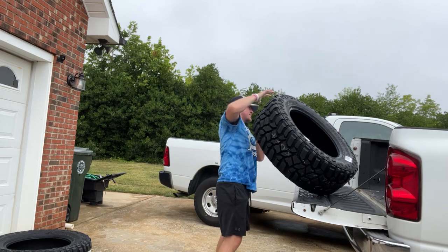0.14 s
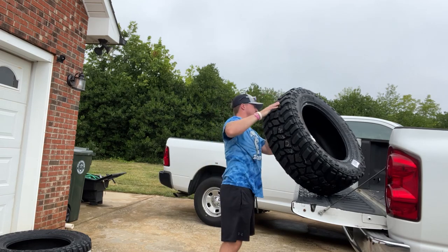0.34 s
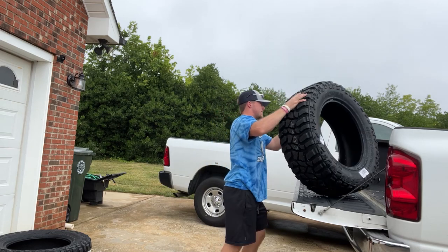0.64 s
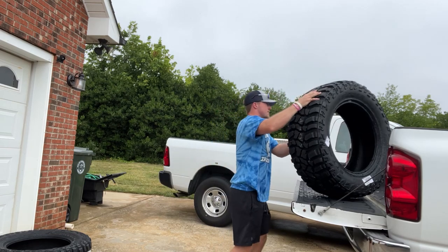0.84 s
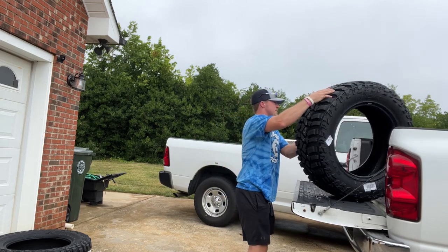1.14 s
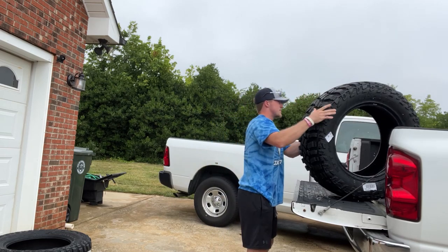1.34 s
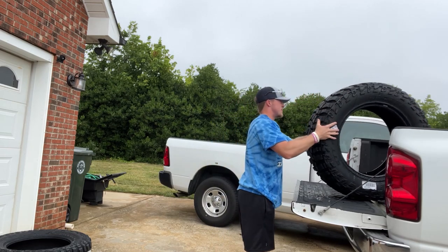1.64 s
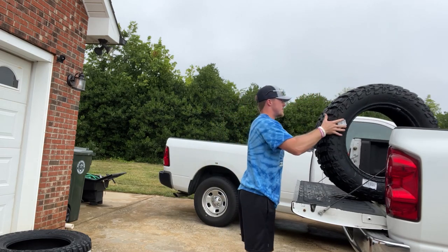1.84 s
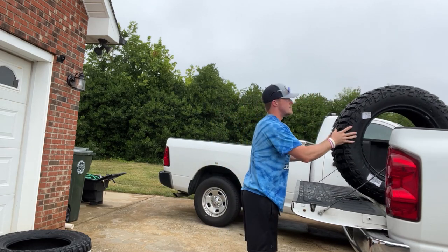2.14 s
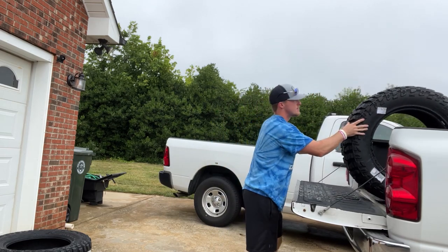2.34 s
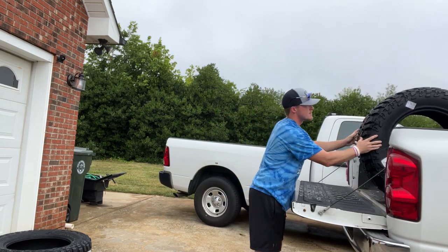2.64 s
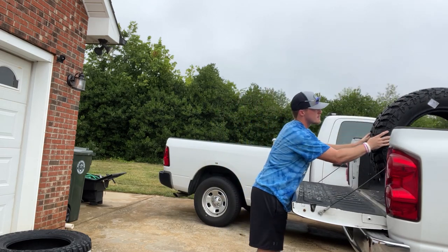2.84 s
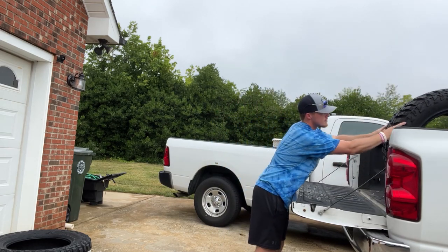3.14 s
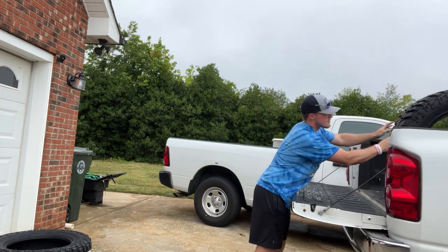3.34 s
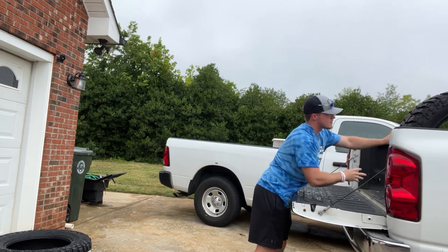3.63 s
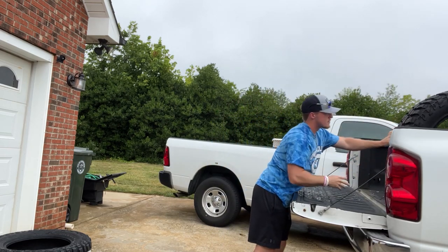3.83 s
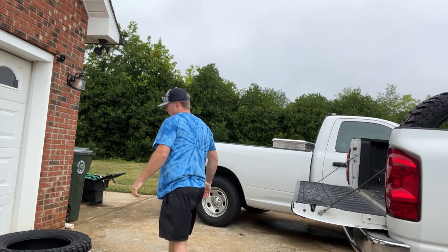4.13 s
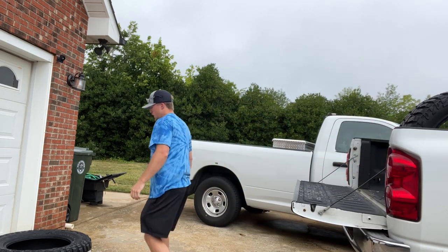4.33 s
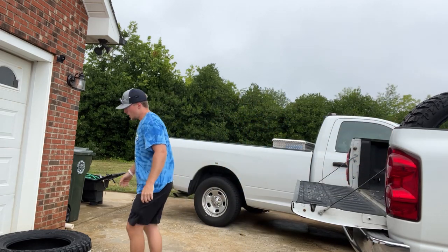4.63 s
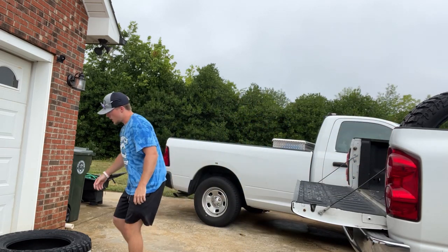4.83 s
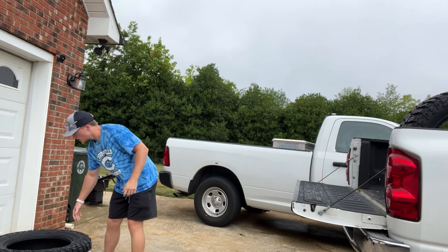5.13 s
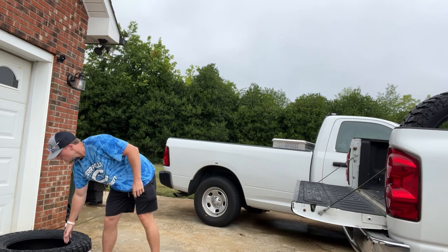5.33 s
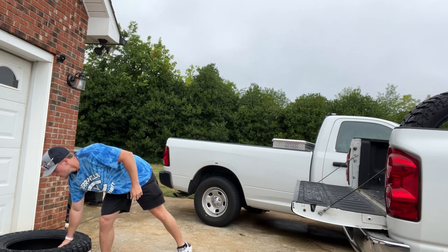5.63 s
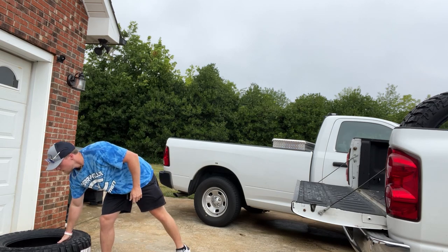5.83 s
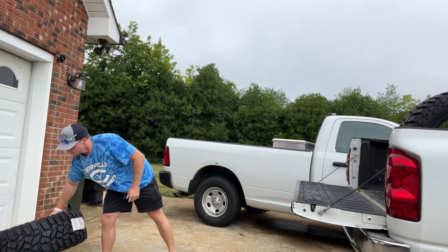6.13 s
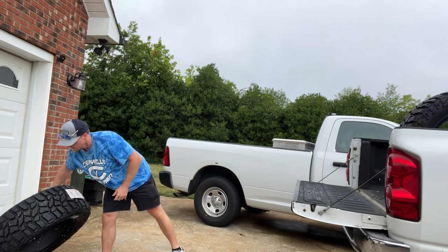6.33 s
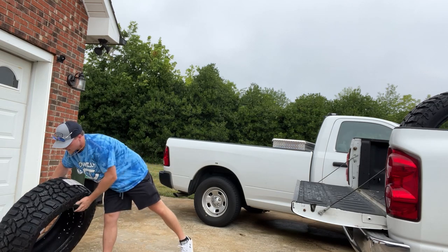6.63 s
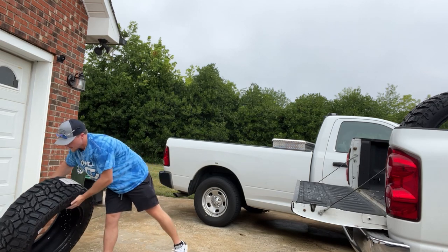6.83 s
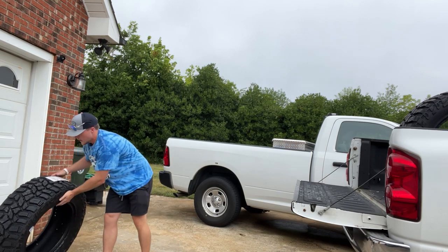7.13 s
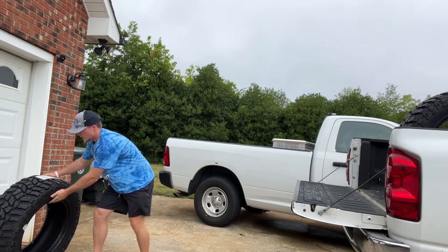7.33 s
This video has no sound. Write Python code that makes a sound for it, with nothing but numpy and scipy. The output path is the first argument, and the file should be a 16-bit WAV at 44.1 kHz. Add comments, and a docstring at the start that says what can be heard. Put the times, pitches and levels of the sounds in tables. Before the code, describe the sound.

At 0 s a heavy tyre lands on a pickup tailgate: deep, dull thumps drop quickly in pitch, with another at 0.25 s, over briefly strong low rumble. Soft rubber scuffs and dry pops continue to about 1.5 s, with faint thumps near 1 and 2.1 s. Songbirds whistle throughout with short outdoor echoes; a quickening, fading run of falling chirps spans 1.5-2.6 s, with a faint insect-like buzz around 2.4-3 s. At 3.4-3.7 s the tyre scrapes and knocks the bed, its steel ringing briefly; a soft thump follows at 3.95. A nearby bird gives a buzzy trill at 4.35-4.8 s. Light scuffs and pops occur from 4.1 to 5.3, then mostly birds. From 6.0 s the second tyre drags on concrete, popping rapidly at 6.2, with the hardest gritty, hissy rubs and hollow knocks at 6.45-6.6. Smaller scuffs follow at 7.1 and 7.3. Close stereo, little reverberation.

```python
"""A heavy tyre has just dropped on a pickup's tailgate: pitch-dropping thumps over low outdoor rumble noise.
Songbirds, as trembling glides with echoes, whistle throughout, one trilling nearby, with a run of chirps from
the hedge and a thin insect-like buzz. Scuffs (grains of slip through resonances) and pops (damped cycles) recur
as the tyre is rolled into the bed, whose steel modes ring. A second tyre is then dragged up off a concrete
drive, with the hardest rubs and knocks. Two microphones a few centimetres apart hear it by delay and level."""
import sys
import numpy as np
from scipy import signal
from scipy.fft import rfft, irfft, next_fast_len
from scipy.io import wavfile
from scipy.ndimage import uniform_filter1d, map_coordinates

SR = 44100
rng = np.random.default_rng(int(sys.argv[2]) if len(sys.argv) > 2 else 0)


def unload_audio(sound):
    """Save the sound as a 16-bit wav file, at the path given as the first command line argument."""
    columns = np.transpose(np.atleast_2d(sound))
    # keep every value between -1 and 1, then stretch to whole-number steps
    steps = np.round(np.clip(columns, -1, 1) * 32767)
    wavfile.write(sys.argv[1], SR, steps.astype(np.int16))


N = 329427  # length [samples]


def gain_of(db):
    """Amplitude ratio of a level in decibels."""
    return 10 ** (np.asarray(db) / 20)


def evened(x):
    """Normalisation to unit root-mean-square amplitude."""
    return x / np.sqrt(np.mean(x ** 2) + 1e-20)


def read(points, hz):
    """Interpolates a spectrum table linearly on a log-frequency axis."""
    f, value = np.transpose(points)
    return np.interp(np.log(hz + 1), np.log(f + 1), value)


def add(mix, s, sound):
    """Linear superposition of a sound onto the mix from time s, cut at the end."""
    part = mix[..., round(s * SR):][..., :sound.shape[-1]]
    part += sound[..., :part.shape[-1]]


def coloured(x, points):
    """Spectral shaping: weights x by a table, silent below it and just above it, at unit rms."""
    size = next_fast_len(N)
    hz = np.fft.rfftfreq(size, 1 / SR)
    inside = (hz > points[0][0]) & (hz < points[-1][0] * 1.05)
    spectrum = rfft(x, size) * gain_of(read(points, hz)) * inside
    return evened(irfft(spectrum, size)[..., :N])


def ringing(x, modes, factor=1):
    """Modal resonance: shifts each mode (moved by a factor) down to zero, smooths, shifts back."""
    out = 0
    for hz, width, db in modes:
        turn = np.exp(2j * np.pi * np.cumsum(hz * factor * np.ones(x.shape[-1])) / SR)
        r = np.exp(-np.pi * width / SR)
        smooth = signal.lfilter([1], [1, -r], x / turn)
        out = out + gain_of(db) * np.sqrt(2 * (1 - r ** 2)) * (turn * smooth).real
    return out / np.linalg.norm(gain_of([mode[2] for mode in modes]))


def spread(x, t60, start):
    """Diffuse reflection: convolution with decaying noise, independent in each ear."""
    t = np.arange(int(.4 * SR)) / SR
    tail = rng.standard_normal((2, len(t))) * gain_of(-60 * t / t60) * (t > start)
    return signal.fftconvolve(x[None], tail / np.linalg.norm(tail[0]), axes=1)[:, :N]


def placed(x, pan_db, reach=1.35):
    """Interaural delay follows the work; lower sounds get a longer delay between the ears (larger reach)."""
    # Where the work is: (time [s], lateness of the left ear before the reach factor [microseconds])
    lag = [(0, 40), (3.4, 132), (4.2, -20), (5.0, -80.5), (5.9, -100), (6.9, -100), (7.1, -20), (7.4, -107)]
    late = reach * np.interp(np.arange(N) / SR, *np.transpose(lag)) * 1e-6 * SR  # samples
    ears = [map_coordinates(x, [np.arange(N) - side * late / 2], order=3, mode="nearest")
            for side in (1, -1)]
    return np.array(ears) * gain_of([[pan_db / 2], [-pan_db / 2]])


def grains(per_s, spread_db):
    """Random impulse process: tiny slips of random sign and size; one shared stream, then one per ear."""
    size = gain_of(spread_db * np.minimum(rng.exponential(1, (3, N)), 4))
    return evened(size * rng.standard_normal((3, N)) * (rng.random((3, N)) < per_s / SR))


def background():
    """Partly coherent noise: low drumming of bed and far traffic, with thin outdoor air in drifting patches."""
    # Low drumming: (time [s], deep part [dB], upper part [dB])
    rumble = [(0.0, -40.5, -41.5), (0.21, -52, -54), (1.79, -56.5, -56.5), (2.1, -54.5, -46),
              (2.58, -56.5, -60.5), (3.7, -50.5, -52.5), (4.28, -54.5, -56), (6.41, -52, -53),
              (6.471, -48, -56), (6.66, -51.5, -52), (7.47, -54, -58.5)]
    # Spectra of the deep part, upper part and air: (frequency [Hz], relative density [dB per Hz])
    deep_spectrum = [(25, -43), (40, -19.5), (55, 1.5), (70, -4.5), (88, -1), (110, -19.5), (150, -24.5)]
    upper_spectrum = [(80, -15), (115, 0), (170, 0), (250, -8.5), (400, -12), (470, -33.5), (700, -49)]
    air_spectrum = [(240, -0.5), (400, -5), (536, 0), (789, -0.5), (1380, -7), (1730, -12), (2750, -9),
                    (3020, -11.5), (4050, -12.5), (6640, -27.5), (10700, -26.5), (13700, -35), (16000, -34)]
    air_db = -67.5
    # Left-right likeness: (frequency [Hz], correlation [-1 to 1])
    likeness = [(60, 0.97), (130, 0.92), (290, 0.69), (640, -0.25), (1410, 0.48), (3100, -0.61),
                (6820, 0.29), (15000, 0.083)]

    frames, hz = N // 256 + 5, np.fft.rfftfreq(1024, 1 / SR)
    a, b, c, d, patches = rng.standard_normal((frames, 513, 5)).T
    patches = uniform_filter1d(patches, size=10, axis=0)  # over frequency
    patches = evened(uniform_filter1d(patches, size=14, axis=1))  # over time
    same = np.clip(read(likeness, hz), -1, 1)[:, None]
    left = a + 1j * b
    right = same * left + np.sqrt(1 - same ** 2) * (c + 1j * d)
    patch_gain = gain_of(2.4 * patches * (hz > 500)[:, None])
    noise = signal.istft(np.array([left, right]) * patch_gain, nperseg=1024, noverlap=768)[1][:, :N]

    s, deep_db, upper_db = np.transpose(rumble)
    t = np.arange(N) / SR
    deep = gain_of(np.interp(t, s, deep_db)) * coloured(noise, deep_spectrum)
    upper = gain_of(np.interp(t, s, upper_db)) * coloured(noise, upper_spectrum)
    return deep + upper + gain_of(air_db) * coloured(noise, air_spectrum)


def whistle(length, hz0, hz1, db, tremble_hz, throb_db=3.5):
    """Frequency and amplitude modulation: a gliding near-sine whose pitch and strength tremble."""
    t = np.arange(int(length * SR)) / SR
    pitch, strength = (evened(uniform_filter1d(z, size=130)) for z in rng.standard_normal((2, len(t))))
    hz = np.linspace(hz0, hz1, len(t)) + tremble_hz * np.clip(pitch, -2, 2)
    tone = np.sin(2 * np.pi * np.cumsum(hz) / SR) * gain_of(db + throb_db * strength)
    return np.sqrt(2) * tone * signal.windows.tukey(len(t), .6)


def birds():
    """Direct and reverberant fields: birds and an insect-like buzz, part direct, part echo off trees and walls."""
    # Sounds that come back, as lists of notes by name; "thin buzz" is a thin insect-like buzz at 6 kHz:
    # (delay [s], length [s], start [Hz], end [Hz], level against the whole [dB], tremble [Hz])
    shapes = {"triplet": [(0, 0.042, 4790, 4910, -6.5, 94), (.028, .06, 3050, 3265, -1, 49.4),
              (.058, .057, 3320, 3940, -6.5, 193.6)], "thin buzz": [(0.0014, 0.24, 6000, 5990, 0, 169.4)],
              "held": [(0, .07, 4090, 3920, 1, 20)], "long held": [(-0.0045, .16, 3824, 3804, -4, 12)],
              "long fall": [(0, .095, 6000, 4700, -11, 90), (.13, .11, 4170, 3180, 2, 20)],
              "flick": [(0, .05, 1780, 2377, -1.5, 19), (.044, 0.025, 2920, 2760, -7.5, 18)]}
    # When they are heard: (time [s], name of sound, level [dB])
    heard = [(.05, "long held", -81), (0.261, "long held", -76.5), (0.52, "long held", -77),
             (.49, "long fall", -88), (.94, "held", -74.5), (.83, "long fall", -74.5),
             (1.109, "held", -74.5), (1.2, "long fall", -74), (1.228, "held", -72), (1.245, "flick", -75),
             (1.545, "flick", -77), (1.685, "flick", -74), (2.135, "flick", -74), (1.95, "triplet", -69.5),
             (1.982, "flick", -78), (2.388, "triplet", -67.5), (2.39, "thin buzz", -90),
             (2.782, "thin buzz", -87), (2.836, "triplet", -67.5), (3.39, "held", -80),
             (5.295, "long fall", -77.5), (5.632, "long fall", -74), (5.765, "triplet", -67.5),
             (6.335, "long fall", -70), (6.4, "flick", -77), (6.661, "triplet", -66), (6.73, "flick", -77),
             (6.892, "flick", -71), (7.035, "flick", -77), (7.193, "flick", -71), (7.352, "flick", -73)]
    # Single notes of several birds: (time [s], length [s], start [Hz], end [Hz], level [dB])
    notes = [(0.033, 0.035, 2930, 3400, -79), (0.633, 0.05, 4000, 3600, -83),
             (0.662, 0.052, 3580, 3460, -78), (0.799, 0.1, 3920, 3900, -78),
             (0.846, 0.065, 2500, 2180, -74.5), (1.17, 0.067, 2250, 2000, -74.5),
             (1.438, 0.066, 2510, 2810, -74), (1.653, 0.031, 2850, 2770, -76),
             (1.726, 0.12, 2010, 2266, -73), (1.791, 0.068, 2235, 2064, -76),
             (1.795, 0.03, 2490, 2860, -73), (1.813, 0.04, 2800, 2800, -71), (1.86, 0.081, 2780, 2410, -82),
             (2.03, 0.098, 2075, 2140, -74.5), (2.08, 0.059, 2810, 2860, -71.5),
             (2.158, 0.1, 2020, 2210, -74.5), (2.232, 0.063, 2956, 2680, -67),
             (2.266, 0.18, 2610, 2600, -75), (2.487, 0.096, 2170, 1980, -74),
             (2.544, 0.028, 2840, 2800, -72.5), (2.611, 0.062, 2104, 2034, -77),
             (2.661, 0.056, 2070, 2590, -77), (2.691, 0.084, 2630, 2734, -72),
             (2.745, 0.087, 2710, 2486, -76.5), (2.985, .05, 2750, 2600, -74.5),
             (3.007, 0.055, 2067, 2090, -72), (3.228, 0.058, 2960, 2660, -74.5),
             (3.871, 0.052, 4600, 3520, -80.5), (3.982, 0.079, 2090, 2050, -76),
             (4.062, 0.088, 2080, 2385, -69), (4.063, 0.08, 2760, 2680, -86),
             (4.134, 0.21, 2416, 2534, -65), (4.873, 0.02, 3850, 3800, -76),
             (4.802, 0.024, 4600, 4530, -65), (5.351, 0.058, 3150, 3530, -74.5),
             (5.386, 0.064, 3520, 3520, -75.5), (5.46, 0.044, 2860, 2920, -73.5),
             (5.534, 0.052, 2067, 2094, -75.5), (5.599, 0.046, 2510, 2880, -72.5),
             (5.635, 0.036, 2816, 2740, -73), (5.657, 0.061, 2696, 2600, -71.5),
             (5.908, 0.04, 2900, 2250, -73), (5.945, 0.038, 2710, 2840, -75.5),
             (5.974, 0.067, 2005, 2150, -75.5), (6.041, 0.044, 2200, 2840, -74),
             (6.078, 0.04, 2860, 2950, -71), (6.643, 0.075, 2170, 2290, -73)]
    # Higher first buzz of the trill: (time [s], length [s], start [Hz], end [Hz], level [dB])
    opening = [(4.352, 0.088, 4920, 4760, -60.5)]
    clear_hz, burry_hz, buzz_tremble_hz = 22, 85, 150
    break_hz, burry_until_s = 2500, 3.9  # single notes just above the break are burry, for a while
    run_s, run_gap_s, run_quicken_s = 1.468, .0845, .0018
    run_db, run_fade_db = -72.5, -0.58  # fade per chirp
    trill_s, trill_gap_s, buzz_s, buzz_mid_hz = 4.464, .0855, 0.058, 4640
    buzz_db, buzz_fade_db, flick_db = -62.5, -0.8, -69  # fade per buzz

    # the flicks come over open ground, the run from deep in the hedge
    far, near, open_air, hedge = np.zeros((4, N))
    for s, name, db in heard:
        field = open_air if name == "flick" else far
        for delay, length, hz0, hz1, note_db, tremble_hz in shapes[name]:
            throb_db = min(4, tremble_hz / 8)  # the steadier the pitch, the steadier the strength
            add(field, s + delay, whistle(length, hz0, hz1, db + note_db, tremble_hz, throb_db))
    for s, length, hz0, hz1, db in notes:
        burry = break_hz < hz0 < 3500 and s < burry_until_s
        add(far, s, whistle(length, hz0, hz1, db, burry_hz if burry else clear_hz))

    # a run of like falling chirps that quickens and fades
    for k in range(16):
        s = run_s + k * run_gap_s - k * (k - 1) / 2 * run_quicken_s
        add(hedge, s, whistle(.055, 4300, 3800, run_db + k * run_fade_db, 30))

    chorus = np.zeros(N)  # birds so far off that only their echo arrives
    for when, pitch, glide, size in rng.random((70, 4)):
        hz = 1900 + 1700 * pitch
        call = whistle(0.028 + 0.066 * size, hz, hz * (.86 + .28 * glide), -82, clear_hz)
        add(chorus, when * N / SR, call)

    # a buzzy trill nearby: the first buzz, then two flicks and a buzz in even time
    for s, *note in opening:
        add(near, s, whistle(*note, buzz_tremble_hz, throb_db=0.0))
    for k in range(4):
        s = trill_s + k * trill_gap_s
        add(near, s - .022, whistle(0.014, 3600, 4500, flick_db - 4, 60))
        add(near, s - .009, whistle(0.016, 3300, 4550, flick_db, 60))
        buzz = whistle(buzz_s, buzz_mid_hz + 60, buzz_mid_hz - 60, buzz_db + k * buzz_fade_db,
                       buzz_tremble_hz, throb_db=-1.0)
        add(near, s, buzz)

    direct = (far + open_air + hedge) * gain_of([[.7], [-.7]]) + near * gain_of([[-.5], [.5]])
    echoing = far + gain_of(-4) * open_air + gain_of(0.5) * hedge + chorus
    far_echo = gain_of(1.5) * spread(echoing, 0.37, .004)
    return direct + far_echo + gain_of(1.5) * spread(near, 0.3, 0.0033)


def thumps():
    """Damped oscillation with falling frequency: dull blows whose pitch drops as the rubber settles."""
    # Blows on tailgate, bed and ground: (time [s], level before rise and decay [dB], settled pitch [Hz])
    blows = [(.003, -34, 61.2), (.02, -31, 54), (0.257, -36.5, 56), (0.983, -45, 126), (2.03, -42.5, 145),
             (2.101, -40, 142), (3.564, -38.5, 193), (3.577, -46.5, 129), (3.595, -37.5, 82),
             (3.951, -41, 89.8), (6.297, -44, 205), (6.531, -55, 218)]
    drop, cycles = 2.234, 20  # first pitch over settled pitch; settled cycles to die by 60 dB
    out, t = np.zeros(N), np.arange(SR // 4) / SR
    for s, db, hz1 in blows:
        hz0, t60 = drop * hz1, cycles / hz1
        hz = hz1 + (hz0 - hz1) * np.exp(-t / 0.0148)
        envelope = gain_of(db - 60 * t / t60) * np.minimum(t / 0.0023, 1)
        add(out, s, np.sin(2 * np.pi * np.cumsum(hz) / SR) * envelope)
    return placed(out, 0.5) + gain_of(-27.0) * spread(out, 0.17, 0.0015)


def bed():
    """Friction-driven modal vibration: uneven slips ring the steel, brighter or duller with the contact."""
    # Modes of the steel bed: (frequency [Hz], width [Hz], relative level [dB])
    steel = [(575, 60, 1.5), (752, 19, -1.5), (980, 56, -6), (1352, 31, 0), (1490, 24, -3), (1724, 64, -8),
             (2166, 80, -2.5), (2600, 110, -5.5), (3020, 250, -6.5), (3600, 110, -7), (4170, 78, -12)]
    # The tyre dragged against the bed: (time [s], length [s], level [dB], tilt [dB per octave])
    scrapes = [(3.443, 0.059, -59, 0.5), (3.52, 0.072, -67, 0.5), (3.643, 0.024, -57, 8.5)]
    rise_s, t60_s = 0.012, 0.061
    out, t = np.zeros(N), np.arange(SR // 4) / SR
    soft_contact = [(400, -3), (1000, 0), (4000, 0), (7000, -30)]  # rubber: (frequency [Hz], [dB per Hz])
    slips = coloured(grains(per_s=2500, spread_db=1.5)[0], soft_contact)
    for s, length, db, tilt_db in scrapes:
        drive = np.minimum(t / rise_s, 1) * gain_of(db - 60 * np.maximum(t - length, 0) / t60_s)
        drive = drive * slips[round(s * SR):][:len(t)]
        tilted = [(hz, width, mode_db + tilt_db * np.log2(hz / 1000)) for hz, width, mode_db in steel]
        add(out, s, ringing(drive, tilted))
    return placed(out, -1.7) + gain_of(1.5) * spread(out, 0.14, 0.0084)


def pops():
    """Impulsive release: damped cycles that sag in pitch, a bright tick on the front, then scattering."""
    # Lugs and grit letting go: (time [s], ring level before damping [dB], ring [Hz], tick level [dB])
    releases = [(0.082, -70, 2000, -55), (0.197, -50, 1900, -63), (0.203, -41, 1400, -70),
                (0.265, -65, 2000, -54), (.533, -63, 2010, -58), (0.743, -42.5, 835, -45),
                (0.764, -43, 1310, -47), (0.992, -31.5, 1100, -62), (1.003, -40, 980, -56),
                (1.001, -46, 3800, -70), (1.012, -42, 1130, -71), (2.247, -60, 2260, -64),
                (4.075, -70, 2180, -68), (4.147, -43, 2380, -54), (4.154, -45, 2410, -65),
                (4.22, -44, 1250, -46), (4.249, -50, 2400, -60), (4.268, -38.5, 1580, -46),
                (4.282, -54, 2490, -46), (4.649, -41.5, 1200, -58), (4.777, -39.5, 696, -43),
                (4.78, -49, 2350, -58), (5.045, -37.5, 2270, -61), (5.071, -33.5, 2230, -60),
                (5.108, -31.5, 1400, -49), (5.112, -34, 1160, -47), (5.195, -42, 1170, -57),
                (5.295, -48.5, 1450, -64), (5.874, -65, 2000, -59), (6.046, -55, 1270, -45),
                (6.074, -60, 2000, -55), (6.105, -51, 2000, -45), (6.125, -63, 2000, -52),
                (6.168, -21.5, 1070, -47), (6.182, -27.5, 1150, -57), (6.212, -27.5, 1160, -55),
                (6.228, -26.5, 1130, -62), (6.237, -35, 900, -55), (6.25, -29.5, 955, -65),
                (6.281, -42, 1020, -54), (6.302, -35.5, 890, -44), (6.461, -33.5, 1150, -48),
                (6.479, -24, 990, -33), (6.535, -33, 915, -48), (6.554, -35, 1300, -38),
                (6.563, -31.5, 1010, -50), (6.6, -52, 1050, -55), (7.09, -37, 1020, -50),
                (7.099, -37, 1390, -62), (7.111, -36, 1100, -60), (7.304, -40.5, 950, -49.5)]
    # Short overtones on each pop: (pitch over ring [ratio], level over ring [dB],
    # decay by 60 dB [cycles of the ring])
    cracks = [(2.184, -11, 12), (3.5, -18.5, 9.6)]
    out, t = np.zeros(N), np.arange(700) / SR
    ticks = rng.standard_normal((len(releases), 700)) * gain_of(-60 * t / .006)
    for (s, db, hz, tick_db), tick in zip(releases, ticks):
        turns = hz * (t + 0.00018 * (1 - np.exp(-t / 0.00039)))  # phase [cycles], fast at first
        ring = np.sin(2 * np.pi * turns) * gain_of(db - 60 * t * hz / 9.2)
        ring = ring * np.minimum(t * hz / 0.32, 1)
        crack = sum(np.sin(2 * np.pi * ratio * turns) * gain_of(db + over_db - 60 * t * hz / cycles)
                    for ratio, over_db, cycles in cracks)
        bright = np.convolve(tick, [.3, .6, 0, -.6, -.3], "same")
        add(out, s, ring + crack + gain_of(tick_db) * bright)
    return placed(out, -1.5) + gain_of(-6) * spread(out, .09, .003)  # scatter off wall and truck


def scuffs():
    """Stick-slip excitation: each rub drives hollow, rubber, grit and hiss; the treble fades first."""
    # Rubbing of tread, hands and soles: (time [s], length [s], tyre level [dB], grit level [dB],
    # hiss level [dB], pitch factor on the rubber [ratio])
    rubs = [(0.0, 0.056, -59.5, -66.5, -73, 0.5), (0.181, 0.027, -53.5, -67, -72, 1.21),
            (0.232, 0.14, -77, -94, -63.5, 0.66), (0.305, 0.083, -63, -76, -53.5, 0.58),
            (0.521, 0.028, -64.5, -63, -67, 0.94), (0.66, 0.032, -87, -85, -69, 0.9),
            (0.735, 0.036, -55.5, -55.5, -54, 0.94), (0.891, 0.074, -75, -71, -72.5, 1.6),
            (0.986, 0.03, -57, -59, -87, 1.2), (1.027, 0.16, -62, -93, -102, 0.5),
            (1.154, 0.022, -58, -54, -64, 1.08), (1.344, 0.05, -63.5, -52.5, -65.5, 0.7),
            (1.494, 0.06, -66, -64.5, -74.5, 1.33), (1.846, 0.023, -94, -61.5, -73, 0.84),
            (2.502, 0.066, -66, -75, -74, 0.82), (3.448, 0.041, -54, -55, -63.5, 1.1),
            (3.558, 0.029, -53, -58, -76, 0.6), (3.635, 0.03, -49, -46.5, -61.5, 0.873),
            (3.73, 0.093, -62.5, -70.5, -98, 0.47), (4.14, 0.012, -64, -65, -78, 1.2),
            (4.211, 0.067, -59, -65, -66, 1.18), (4.308, 0.04, -59.5, -65, -71, 1.05),
            (4.371, 0.016, -70, -59, -77, 1.3), (4.638, 0.042, -57, -69, -63, 0.96),
            (4.764, 0.028, -48.5, -53.5, -50, 1.38), (5.019, 0.05, -53, -62.5, -69.5, 2.2),
            (5.08, 0.053, -62, -58.5, -74, 1.25), (5.182, 0.019, -58, -61.5, -77, 0.83),
            (5.773, 0.041, -98, -81, -78.5, .9), (5.857, 0.035, -96, -69, -69, 1.3),
            (5.938, 0.11, -74.5, -77.5, -73.5, 1.5), (6.03, 0.17, -63.5, -64.5, -64, 0.82),
            (6.115, 0.053, -57.5, -56, -51, 0.98), (6.17, 0.071, -52.5, -50.5, -76, 0.91),
            (6.285, 0.017, -48.5, -51, -55.5, 0.79), (6.451, 0.045, -39.5, -40, -44, 1.1),
            (6.473, 0.031, -38.5, -46, -44.5, 0.97), (6.5, 0.025, -42, -48, -47.5, 1.02),
            (6.526, 0.027, -43.5, -42.5, -49, 0.91), (6.544, 0.013, -43, -44.5, -42, 0.85),
            (6.569, 0.0099, -44.5, -44, -44.5, 0.98), (6.764, 0.17, -66, -62, -64.5, 3.6),
            (6.835, 0.032, -69, -55.5, -82, 1.35), (7.078, 0.034, -46, -58.5, -51.5, 1.15),
            (7.295, .025, -58.5, -56, -64, 0.83)]
    # Resonances of the air and carcass of the tyre: (frequency [Hz], width [Hz], relative level [dB])
    hollow_modes = [(244, 22, 0), (310, 60, -14), (432, 12, -9), (574, 12, -11), (713, 7, -19),
                    (768, 9, -19)]
    # Resonances of sidewall and lugs: (frequency before the pitch factor [Hz], width [Hz], level [dB])
    rubber_modes = [(760, 380, -2.5), (990, 61, -2), (1070, 72, -3.5), (1465, 190, -6.5)]
    # Blows that ring the hollow of the tyre: (time [s], level [dB])
    knocks = [(3.562, -16.5), (3.644, -18), (6.3, -23), (6.46, -10.5), (6.47, -10), (6.521, -16),
              (6.533, -14)]
    # Spectra of grit and hiss: (frequency [Hz], relative density [dB per Hz])
    grit_spectrum = [(400, -6), (1000, -6), (1900, -11), (2400, -2), (4500, -1), (6000, -7), (8000, -18)]
    hiss_spectrum = [(4500, -25), (7000, -5), (9500, 1), (11000, -2), (12800, -6), (13500, -14),
                     (15500, -12)]
    # Stereo image of hollow, rubber, grit, hiss: (left-right difference [dB],
    # scattered part heard by one ear [dB], factor on the delay [ratio])
    width = [(1.2, -6, 2.2), (-1.2, -7, 1.6), (-1.5, -4, 1.3), (-.3, -12, 1.02)]
    rise_s, rise_share = 0.012, 0.17  # a longer rub swells more slowly
    t60_s, t60_per_s = 0.12, 3.77  # and dies more slowly
    hollow_over_db, knock_s = -3, 0.0025  # hollow against rubber; contact time
    late_from_s, late_top_db, early_top_db = 5.6, 7.5, -15  # the later hiss is brighter above 12.3 kHz

    power, pitch = np.zeros((4, N)), np.ones(N)
    t = np.arange(SR // 2) / SR
    fade = np.array([[1.], [1.], [.9], [.7]])  # share of the decay time
    for s, length, tyre_db, grit_db, hiss_db, factor in rubs:
        rise, t60 = rise_s + rise_share * length, t60_s + t60_per_s * length
        db = np.array([tyre_db + hollow_over_db, tyre_db, grit_db, hiss_db])[:, None]
        sag_db = -4.0 * np.minimum(t / length, 1) - 60 * np.maximum(t - length, 0) / (t60 * fade)
        add(power, s, (np.minimum(t / rise, 1) * gain_of(db + sag_db)) ** 2)
        pitch[round(s * SR):] = factor

    # stick and slip, half shared by the parts
    judder = uniform_filter1d(rng.standard_normal((4, N)) + rng.standard_normal(N), size=400)
    hollow, rubber, grit, hiss = np.sqrt(power) * gain_of(2.5 * evened(judder))
    coarse, fine = grains(per_s=2600, spread_db=0.85), grains(per_s=9000, spread_db=0.0)
    steep = ringing(rubber * coarse, [(1010, 3800, 0)], pitch) / 4.13  # keeps the rubber's skirts dark

    hiss_noise = coloured(fine, hiss_spectrum)
    highpass = signal.butter(4, 12300, "high", fs=SR, output="sos")
    top = signal.sosfiltfilt(highpass, hiss_noise)
    top_db = np.where(np.arange(N) > late_from_s * SR, late_top_db, early_top_db)
    hiss_noise = hiss_noise + top * (gain_of(top_db) - 1)

    drum = hollow * coarse
    push = np.hanning(int(knock_s * SR) + 3)
    for s, db in knocks:
        add(drum[0], s, gain_of(db) * push / push.sum())

    parts = [ringing(drum, hollow_modes), ringing(steep, rubber_modes, pitch),
             grit * coloured(fine, grit_spectrum), hiss * hiss_noise]
    out = 0
    for (shared, *own), (pan_db, own_db, reach) in zip(parts, width):
        out = out + placed(shared, pan_db, reach) + gain_of(own_db) * np.array(own)
    return out + gain_of(-11) * spread(out.mean(0), .22, .01)  # slap off the wall and the truck


def scene():
    """Superposition of all sources at the two microphones."""
    return background() + birds() + thumps() + bed() + pops() + scuffs()


def record(dry):
    """Band limitation: a linear-phase low-pass filter at 15.9 kHz."""
    lowpass = signal.firwin(511, 15900, window=("kaiser", 9), fs=SR)
    return signal.oaconvolve(dry, lowpass[None], "same")


dry = scene()
out = record(dry)
unload_audio(out)
```